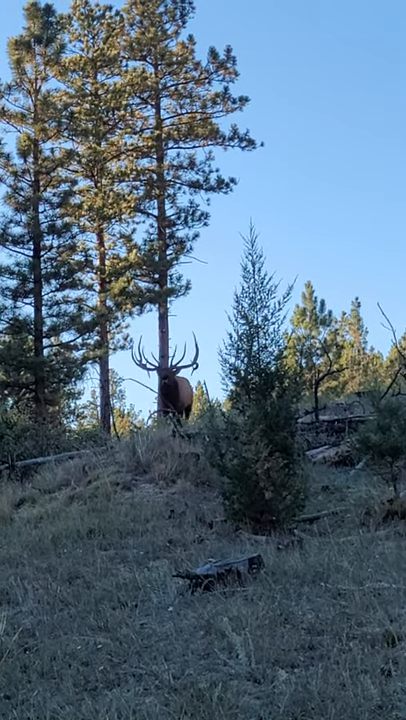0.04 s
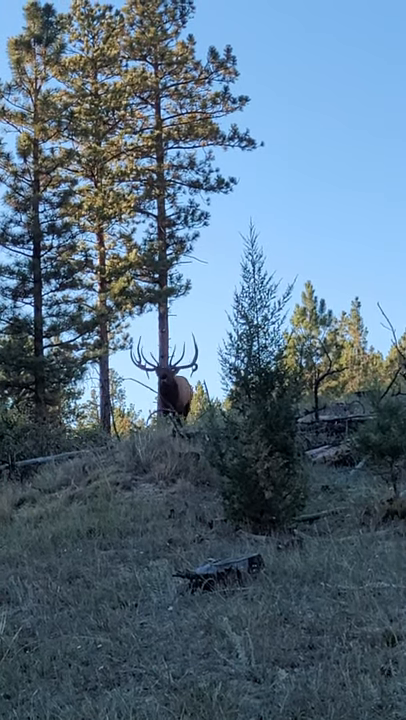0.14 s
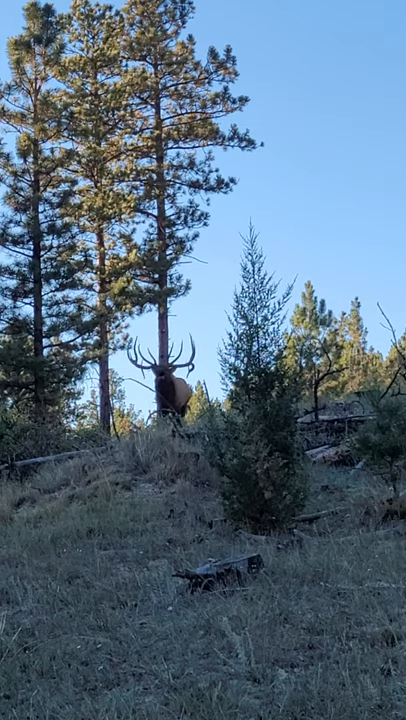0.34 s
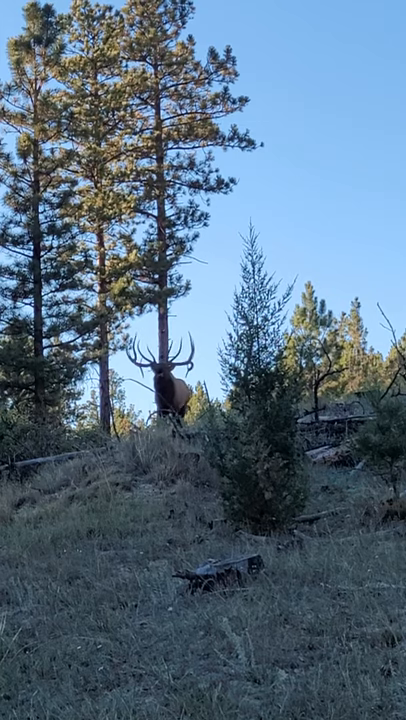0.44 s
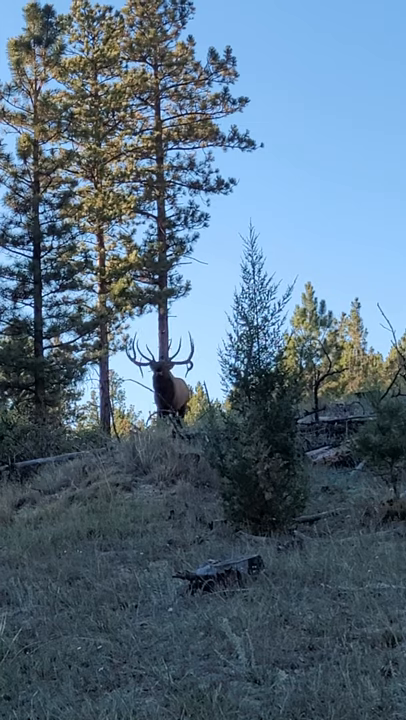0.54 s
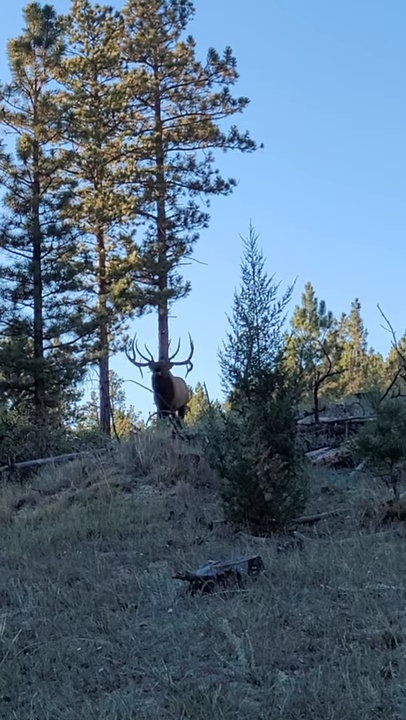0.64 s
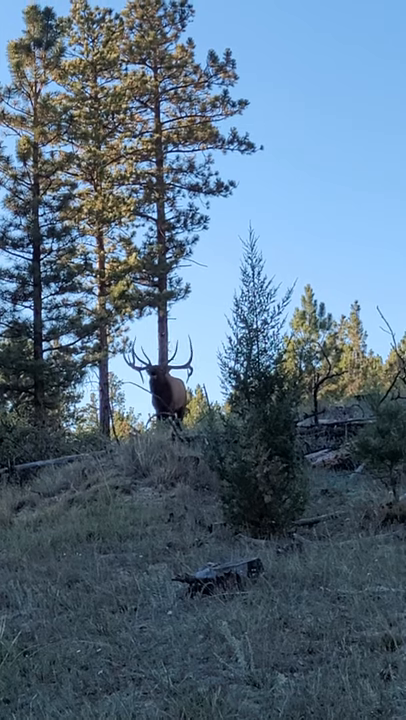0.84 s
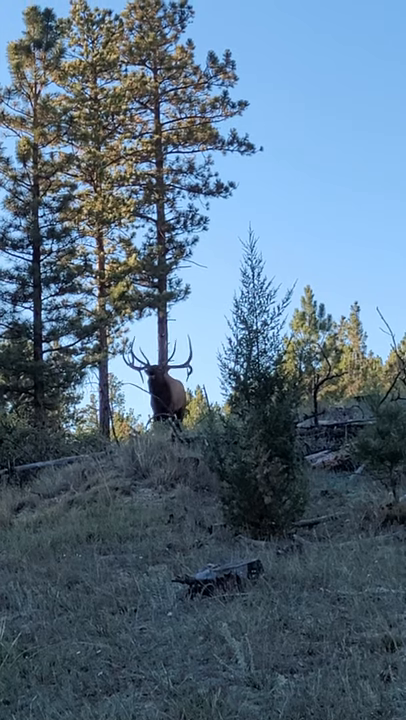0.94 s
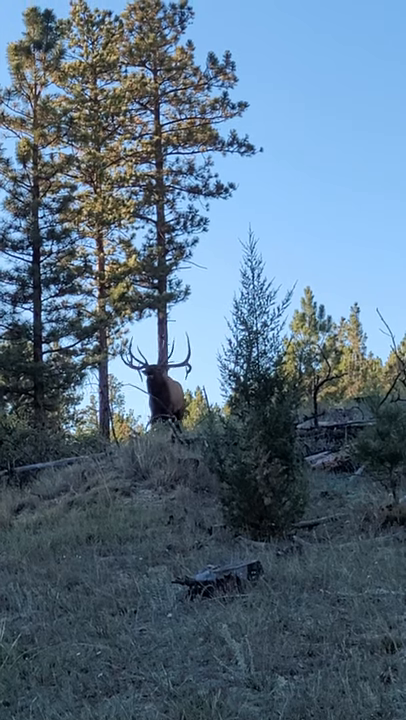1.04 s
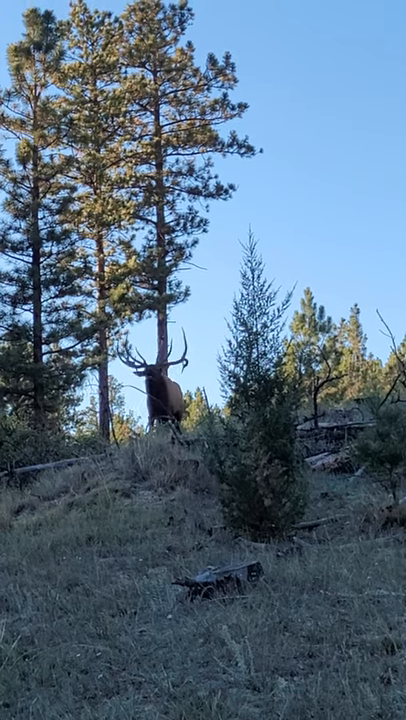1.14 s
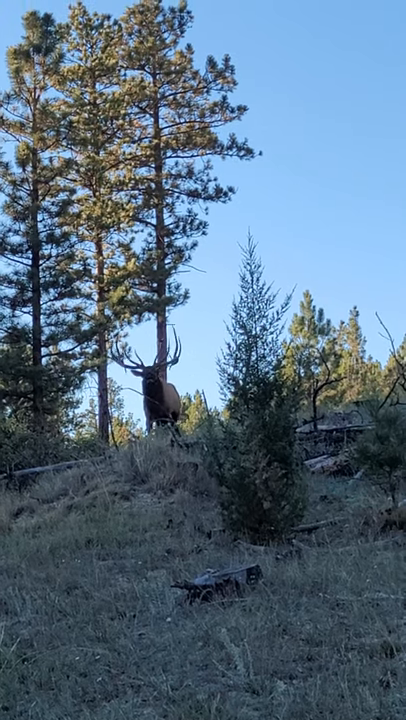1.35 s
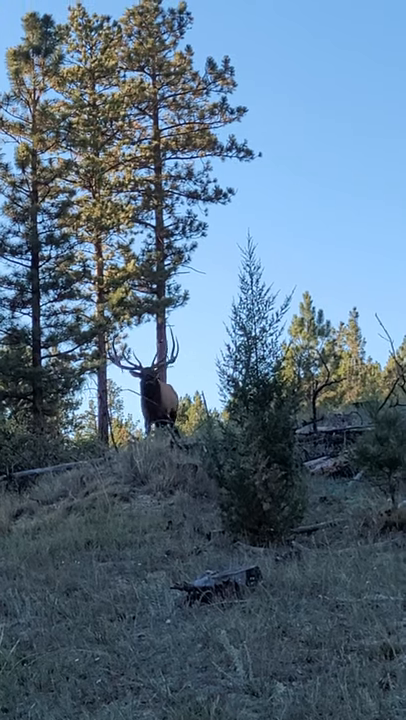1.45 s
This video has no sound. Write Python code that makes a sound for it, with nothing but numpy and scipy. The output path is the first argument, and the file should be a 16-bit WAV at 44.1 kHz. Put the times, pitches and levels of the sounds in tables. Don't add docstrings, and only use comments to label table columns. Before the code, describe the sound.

One elk call, heard from some distance through a small handheld microphone: a throbbing, growly whistle jumps upward to a piercing pitch, falls suddenly into a low grunt, leaving a thin tree echo and quiet air hiss.

```python
import sys
import numpy as np
from scipy import signal
from scipy.fft import rfft, irfft
from scipy.io import wavfile
from scipy.ndimage import uniform_filter1d

SR = 44100
rng = np.random.default_rng(int(sys.argv[2]) if len(sys.argv) > 2 else 0)


def gain_from_db(level_db):
    decades = np.asarray(level_db, float) / 20
    return 10 ** decades


def wrap_up_sound(samples):
    columns = np.atleast_2d(samples).T
    tamed = np.clip(columns, -1, 1)
    steps = np.round(tamed * 32767).astype(np.int16)
    wavfile.write(sys.argv[1], SR, steps)


N = 66150

# time in seconds, pitch in Hz, level in dB,
# brightness in dB per harmonic, breath in dB.
WHISTLE = [(0, 870, -56.5, -2, 7), (.14, 950, -41.5, -5, -36), (.18, 1040, -48, -9, -15),
           (.25, 985, -41.5, -6, -19), (.36, 1085, -41, -3.5, -6), (.405, 1265, -35, -5, -6.5),
           (.47, 1258, -32, -4.5, -32.5), (.572, 1312, -30.5, -4, -28), (.58, 1450, -37, -3, 0),
           (.612, 1585, -35, -4.5, -27.5), (.63, 1600, -31.5, -3, -14.5), (.645, 1690, -41, -4, -14.5),
           (.73, 1725, -43, -3.5, -13), (.78, 1770, -30.5, -1.5, -18), (.847, 1792, -27.5, -4.5, -21),
           (.851, 1935, -29, -1.5, -31.5), (.92, 2040, -36.5, -4, -24.5), (1.0, 2142, -29.5, -2.5, -25)]
DROP = [(1.108, 2168, -32.5, -1.5, -23), (1.119, 1912, -34, -2.5, -35), (1.132, 1289, -33.5, -3, 4),
        (1.155, 930, -40, -2, -14), (1.165, 685.3, -37.5, -7.5, -11), (1.19, 632, -54, -25, -31)]
# time in seconds, beat in Hz, depth from 0 to 1, dying time in seconds.
JUMPS = [
    (0.571, 167, 0.7, 0.022),
    (0.634, 109, 0.4, 0.02),
    (0.851, 161, 0.79, .025),
]
# pitch in Hz, width in Hz, level in dB.
THROAT = [(1944, 37, 12), (2167, 22, -29), (2637, 227, 17.5), (3960, 84, 11.5), (4445, 89, 10.5),
          (5584, 120, 13.5), (6740, 210, -7), (7600, 230, 9.5)]
# pitch in Hz, width in Hz, level in dB.
PIPE = [(927, 11.2, 18.5), (1051.3, 25.6, 20), (1310, 15.1, 16), (1584, 10.7, 23), (1783.6, 36, 19)]
# frequency in Hz, level in
# dB.
AIR = [(900, -10), (1500, -6), (2600, -1), (4300, -3), (8800, -4.5), (9700, -14), (13800, 3.5),
       (15500, -12)]
# time in seconds, pitch in Hz, level in dB, roughness from 0 to 1.
GROWL = [(0, 110, -47, 0.31), (.12, 100.9, -46.5, 0.23), (.27, 104.9, -43.5, 0.36), (.3, 168.9, -41, 0.51),
         (.4, 169.8, -40.5, 0.39), (.5, 171.2, -39, 0.53), (.56, 172, -40.5, 0.82),
         (.63, 166.3, -52.5, 0.5), (.67, 182.6, -80.5, 1.11)]
# time in seconds, pitch in Hz, level in dB, roughness from 0 to 1.
GRUNT = [(1.1, 150, -81.5, 0.73), (1.112, 147.1, -45, 0.6), (1.135, 142.3, -37, 0.54),
         (1.17, 120.6, -42, 0.43), (1.19, 122, -48.5, 0.43), (1.22, 105.7, -61, 0.8),
         (1.27, 110, -79.5, 0.9)]
# pitch in Hz, width in Hz, level in dB.
CHEST = [(110, 31.8, 2.5), (172, 33.8, 6.5), (208.4, 68.6, 0), (297.5, 20, -13), (359, 20, -27),
         (561.7, 27.6, -7.5), (668, 17.8, -7.5), (982, 21.6, 1), (1832, 40, -1), (2730, 102, 0),
         (4174, 270, -4.5), (5830, 710, -17)]
# pitch in Hz, width in Hz, level in dB.
BODY_RING = [(644.5, 9, 5.5), (930, 4.9, -12.5), (1308, 4, 2), (1660, 3.9, -9), (1785, 9, -9.5)]
# pitch in Hz, width in Hz, level in dB.
NOSE_RING = [(645.7, 18.3, 14.5)]
# frequency in Hz, lead in radians.
LEFT_LEAD = [(100, 0.15), (500, 0.11), (1500, 0.4), (3300, 0.85), (7300, 0.26), (10800, 4.1), (15400, 4.36)]
# frequency in Hz, left minus right in dB.
LEFT_LEAN = [(100, -1.5), (300, -0.4), (600, 1.5), (1650, -3.5), (5000, 2), (15000, -5)]
# time in seconds, level in dB.
NEEDLES = [(0, -114), (.3, -106), (.55, -65.5), (.9, -48.5), (1.15, -54), (1.5, -53.5)]
# frequency in Hz, level in dB per Hz.
HISS = [(30, -21), (70, -21), (160, -17.5), (500, -14.5), (900, -19.5), (1800, -23), (3000, -32.5),
        (7500, -30.5)]
# frequency in Hz, side minus mid in dB.
HISS_SIDE = [(60, -36), (240, -8), (950, -3.5), (3770, -5.5), (15000, -23.5)]
# frequency in Hz, level in dB.
TREBLE_DIPS = [(8800, -1), (9500, -10.5), (10500, -5), (12500, -11.5), (13500, -5)]

WHISTLE_WOBBLE, GRIPPED_WOBBLE, DROP_WOBBLE = 0.0032, 0.006, 0.03
WHISTLE_RELEASE_S = 0.011
LEVEL_THROB = 0.24
EARLY_BEND, LATE_BEND, SHIFT_S = -0.67, 0.57, 0.31
JUMP_BEND, JUMP_RISE_S = 0.5, 0.004
HALF_FROM_S, HALF_DB = 0.91, -26
WAVER_DB, BREATH_LEAK_DB, BREATH_CUT_HZ, CHEST_AIR_DB = 4.5, -26, 8300, -40.5
PITCH_SCATTER, PULSE_SHARPNESS = 0.1154, 14
UNEVEN_PULSES = 0.76
NOISE_FLOOR = 0.2
FULL_GRIP_DB = -51
ECHO_DB, ECHO_SIDE_DB, ECHO_T60_S, ECHO_GAP_S = -24, -2, 0.49, 0.0049
ECHO_BAND_HZ = [350, 1690]
NEEDLES_HZ, NEEDLES_WIDTH_HZ, NEEDLES_LEFT_DB = 14500, 5500, -11.5
HISS_DB = -68.5


def in_time(rows):
    s, *columns = np.transpose(rows)
    return [np.interp(np.arange(N) / SR, s, c) for c in columns]


def at_hz(points):
    hz, value = np.transpose(points)
    return np.interp(np.log(np.fft.rfftfreq(N, 1 / SR) + 1), np.log(hz), value)


def filtered(x, order, hz, kind="low"):
    return signal.sosfilt(signal.butter(order, hz, kind, fs=SR, output="sos"), x)


def even(x, span_s):
    size = int(span_s * SR)
    power = uniform_filter1d(uniform_filter1d(x ** 2, size), size)
    return x / np.sqrt(power + 1e-12)


def drift(rate_hz):
    slow = filtered(rng.standard_normal(N + SR), 2, rate_hz)[SR:]
    return slow / slow.std()


def resonate(x, peaks):
    out = 0
    for k, (hz, width, db) in enumerate(peaks):
        r = np.exp(-np.pi * width / SR)
        top = [(1 - r * r) / 2, 0, (r * r - 1) / 2]
        bottom = [1, -2 * r * np.cos(2 * np.pi * hz / SR), r * r]
        out = out + (-1) ** k * gain_from_db(db) * signal.lfilter(top, bottom, x)
    return out


def whistle(folds, grip):
    t = np.arange(N) / SR
    hz, db, bright_db, breath_db = in_time([*WHISTLE, *DROP])
    fray = np.where(t > DROP[0][0], DROP_WOBBLE, GRIPPED_WOBBLE)
    wobble = WHISTLE_WOBBLE * drift(82) + fray * grip * drift(170)
    phase = 2 * np.pi * np.cumsum(uniform_filter1d(hz, size=60) * (1 + wobble)) / SR

    bend = np.where(t > SHIFT_S, LATE_BEND, EARLY_BEND) * grip * np.sin(folds)
    beat = LEVEL_THROB * grip * np.cos(folds)
    half_growth = np.clip((t - HALF_FROM_S) / 0.45, 0, 1)
    throb = 1 + gain_from_db(HALF_DB) * half_growth * np.cos(phase / 2)
    for s, beat_hz, depth, dying in JUMPS:
        rise = np.clip((t - s) / JUMP_RISE_S, 0, 1)
        fight = depth * rise * (1 + 0.39 * drift(60)) * np.exp(-np.abs(t - s) / dying)
        turn = 2 * np.pi * beat_hz * (t - s)
        throb = throb * (1 + fight * np.cos(turn))
        phase = phase + JUMP_BEND * fight * np.sin(turn)

    tones = []
    for k in range(12):
        tone_db = bright_db * min(k, 5.5) ** 1.007 + WAVER_DB * min(k, 2) / 2 * drift(9.9)
        shaken = 1 + min(k + 0.9, 1) * beat
        wave = np.sin((k + 1) * phase + min(k + 0.069, 1.2) * bend)
        tones.append(gain_from_db(tone_db) * shaken * wave * (hz * (k + 1) < 15700))

    air = filtered(rng.standard_normal(N), 6, BREATH_CUT_HZ)
    breath = gain_from_db(breath_db) * air * (1 + np.cos(phase)) * (1 + grip * np.cos(folds))
    jet = sum(tones) + gain_from_db(BREATH_LEAK_DB) * breath
    root = tones[0] + 0.3 * breath
    parts = throb * np.array([jet, root, breath])
    jet, root, breath = irfft(rfft(parts) * gain_from_db(at_hz(AIR)), N)
    jet = filtered(jet, 2, 600, "high")
    chest_air = filtered(resonate(air, CHEST[3:8]), 4, 260, "high")
    voice = even(jet + resonate(jet + breath, THROAT) + resonate(root, PIPE), 0.022)
    voice = voice + gain_from_db(CHEST_AIR_DB) * chest_air / chest_air.std()
    release_db = 20 * np.maximum(t - DROP[-1][0], 0) / WHISTLE_RELEASE_S
    return gain_from_db(db - release_db) * voice


def chest(rows):
    hz, db, rough = in_time(rows)
    rough = np.clip(rough, 0, 1)
    phase = 2 * np.pi * np.cumsum(hz * (1 + PITCH_SCATTER * rough * drift(50.7))) / SR
    opening = (1 + np.cos(phase)) / 2
    strength = 1 + rough * drift(90) + UNEVEN_PULSES * rough * np.cos(phase * 2 / 3)
    pulses = opening ** PULSE_SHARPNESS * strength
    pulses = np.diff(pulses, prepend=pulses[0])
    noise = (NOISE_FLOOR + opening ** 2) * rng.standard_normal(N)
    source = (1 - rough) * pulses / pulses.std() + 2.0 * rough * noise
    grip = np.clip(gain_from_db(db - FULL_GRIP_DB), 0, 1)
    return gain_from_db(db) * even(resonate(source, CHEST), 0.012), phase, grip


def trees(x):
    t = np.arange(SR) / SR
    tail = rng.standard_normal((2, SR)) * gain_from_db(-60 * t / ECHO_T60_S) * (t > ECHO_GAP_S)
    tail = filtered(tail, 2, ECHO_BAND_HZ, "band")
    tail = tail / np.sqrt((tail ** 2).sum(1, keepdims=True))
    mid, side = signal.fftconvolve(x[None], tail, axes=1)[:, :N]
    return gain_from_db(ECHO_DB) * (mid + gain_from_db(ECHO_SIDE_DB) * side * [[1], [-1]])


def needles():
    band = [(NEEDLES_HZ, NEEDLES_WIDTH_HZ, 0)]
    rustle = resonate(resonate(rng.standard_normal(N), band), band)
    pair = np.array([rustle * gain_from_db(NEEDLES_LEFT_DB), -rustle])
    return gain_from_db(in_time(NEEDLES)[0]) * pair / rustle.std()


def hiss():
    mid, side = rfft(rng.standard_normal((2, N))) * gain_from_db(at_hz(HISS))
    mid, side = irfft(mid, N), irfft(side * gain_from_db(at_hz(HISS_SIDE)), N)
    return gain_from_db(HISS_DB) / mid.std() * (mid + side * [[1], [-1.3]])


def scene():
    growl, growl_folds, growl_grip = chest(GROWL)
    grunt, grunt_folds, grunt_grip = chest(GRUNT)
    folds = np.where(growl_grip > grunt_grip, growl_folds, grunt_folds)
    elk = growl + grunt + whistle(folds, growl_grip + grunt_grip)
    elk = elk + resonate(elk, BODY_RING) + resonate(grunt, NOSE_RING)
    left = gain_from_db(at_hz(LEFT_LEAN) / 2) * np.exp(0.5j * at_hz(LEFT_LEAD))
    direct = irfft(rfft(elk) * [left, 1 / left], N)
    return direct + trees(elk) + needles() + hiss()


def roll_off(x):
    return signal.sosfilt(signal.butter(12, 15890, fs=SR, output="sos"), x)


def record(dry):
    mix = irfft(rfft(dry) * gain_from_db(at_hz(TREBLE_DIPS)), N)
    return roll_off(mix)


dry = scene()
out = record(dry)
wrap_up_sound(out)
```